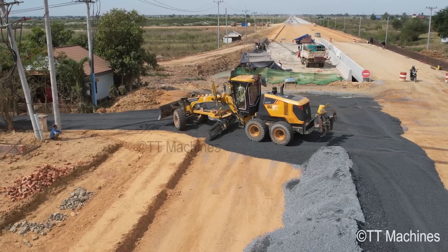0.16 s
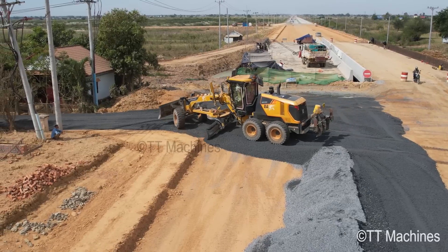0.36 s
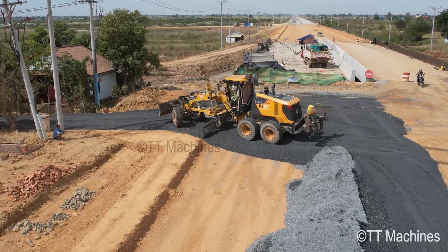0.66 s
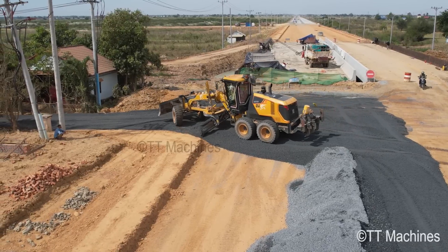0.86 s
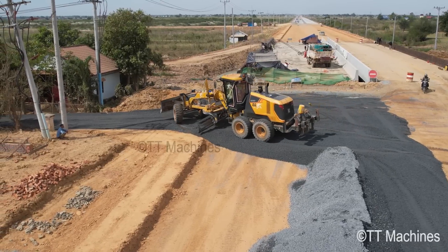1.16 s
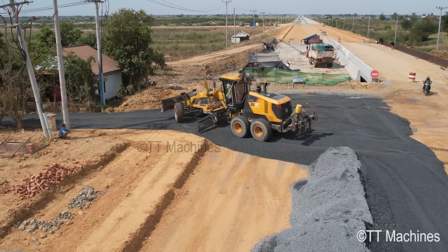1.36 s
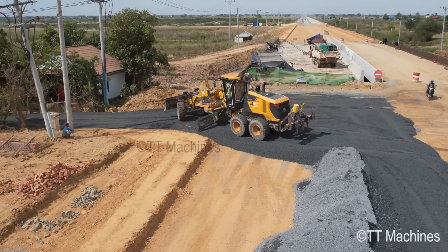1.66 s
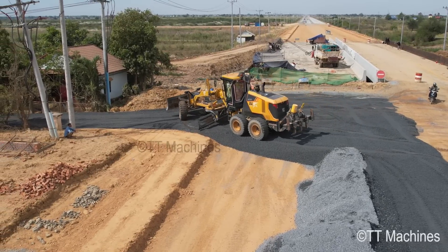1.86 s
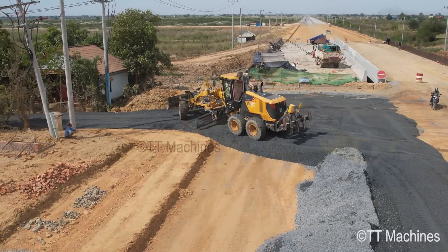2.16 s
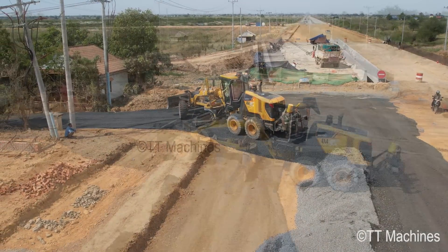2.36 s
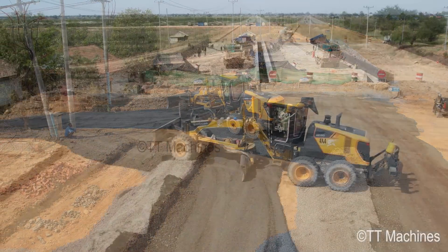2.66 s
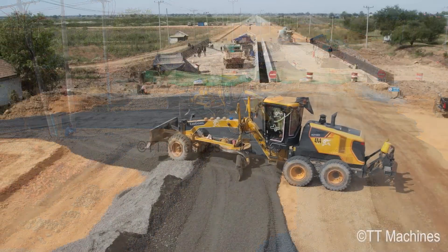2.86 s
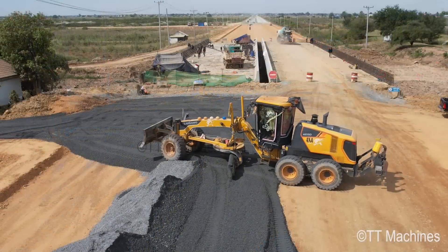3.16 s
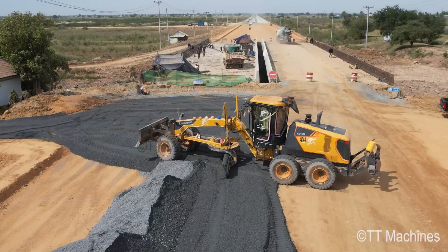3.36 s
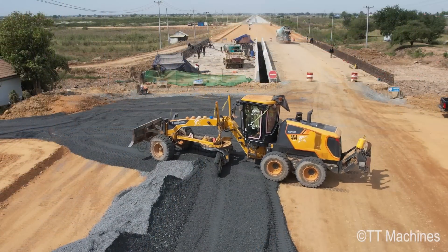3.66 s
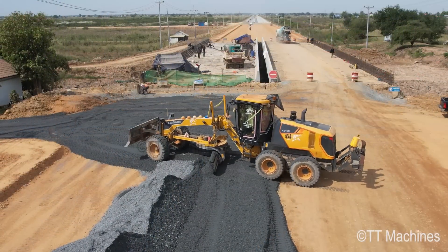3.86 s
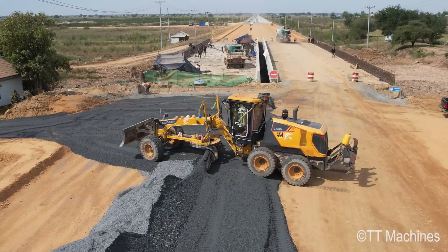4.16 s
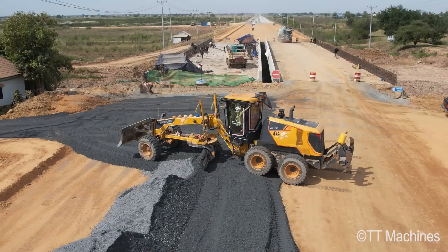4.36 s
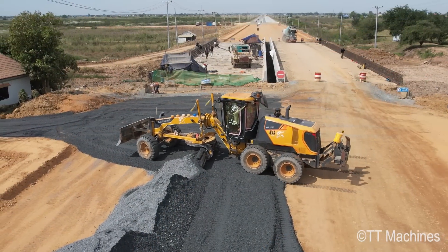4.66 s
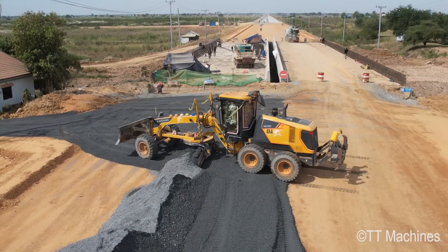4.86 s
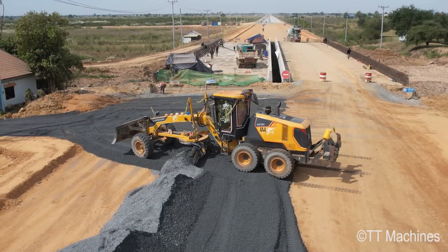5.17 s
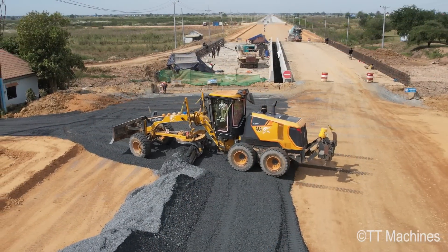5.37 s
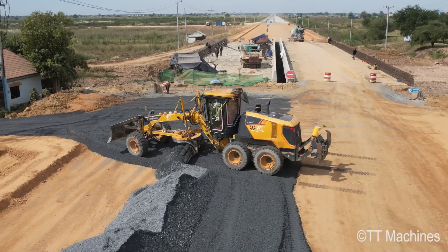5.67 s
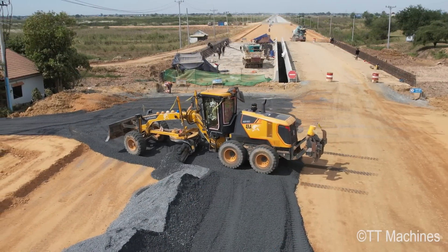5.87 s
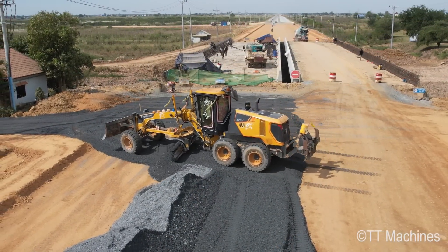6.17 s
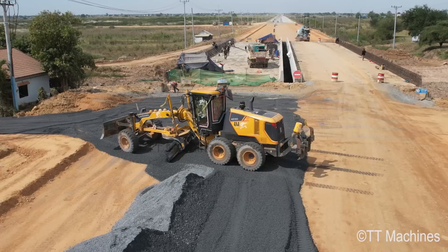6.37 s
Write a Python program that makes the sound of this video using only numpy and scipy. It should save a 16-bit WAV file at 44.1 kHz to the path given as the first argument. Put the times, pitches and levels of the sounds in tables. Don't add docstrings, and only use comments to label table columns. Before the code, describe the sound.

Outdoors at a roadworks site, a heavy diesel grader roars right beside a stereo microphone, with throbbing exhaust, pump and gear hums, rushing air and a thin turbo whistle. Just before two seconds it abruptly becomes farther, quieter and duller. Gravel hisses along the blade, stones tick and two crack sharply, then the exhaust turns toward us and its low throb rebuilds. Pump whines and faint bird whistles follow.

```python
import sys
import numpy as np
from scipy import signal
from scipy.io import wavfile
from scipy.ndimage import uniform_filter1d, map_coordinates

SR = 44100
rng = np.random.default_rng(int(sys.argv[2]) if len(sys.argv) > 2 else 0)


def int16_out(signal):
    q = np.round(np.clip(np.atleast_2d(signal).T, -1, 1) * 32767)
    wavfile.write(sys.argv[1], SR, q.astype(np.int16))


def voltage_ratio(decibels):
    exponent = np.asarray(decibels, float) / 20
    return 10 ** exponent


N = 286650
T = np.arange(N) / SR
CHANGE_S = 1.92

# (frequency [Hz], likeness [0-1], right over left [dB], right leads by [radians])
OPENINGS_TOP = [(8300, .93, -.5, .15), (9470, .94, 0, 1.35), (10350, .94, 0, 2.55), (12100, .9, 0, 3.7),
                (12950, .8, 0, 4.9), (13800, .9, 0, 6.28)]
# (time [s], ground echo delay [ms], turn [0-1])
MACHINE_PATH = [(1.92, 1.47, .02), (3.0, 1.48, 0.05), (3.6, 1.62, 0.33), (4.1, 1.69, 0.7),
                (4.8, 1.74, 0.87), (6.5, 1.77, 1)]


def evened(x):
    return x / np.sqrt(np.mean(abs(x) ** 2) + 1e-20)


def columns(rows, at):
    key, *rest = np.transpose(rows)
    return [np.interp(at, key, column) for column in rest]


def swells(rows, rest_db=0):
    level_db = rest_db
    for centre_s, length_s, db in rows:
        inside = np.clip(2 - 4 * abs(T - centre_s) / length_s, 0, 1)
        level_db = level_db + (db - rest_db) * inside
    return level_db


def wander(per_s):
    steps = rng.standard_normal(int(7 * per_s) + 3)
    coarse_t = T[::64]
    smooth = map_coordinates(steps, [coarse_t * per_s], order=3)
    return np.interp(T, coarse_t, evened(smooth))


def line(hz, db, flutter_db=3., flutter_per_s=12., waver=.002):
    turns = np.cumsum(hz * (1 + waver * wander(flutter_per_s))) / SR + rng.random()
    flutter = evened(voltage_ratio(flutter_db * wander(flutter_per_s)))
    return np.sqrt(2) * voltage_ratio(db) * flutter * np.sin(2 * np.pi * turns)


def heard(layers, tones, openings, echo, patchy_db):
    hz, t, tone = signal.stft(tones, SR, nperseg=2048, noverlap=1536)
    power = 0
    for colour, level_db in layers:
        f, db = np.transpose(colour)
        colour_db = np.interp(np.log(hz + 1), np.log(f), db, left=-90, right=-90)
        shape = evened(voltage_ratio(colour_db)) ** 2
        power = power + np.outer(shape, voltage_ratio(np.interp(t, T, level_db)) ** 2)

    def noise():
        return rng.standard_normal(tone.shape) + 1j * rng.standard_normal(tone.shape)

    patches = uniform_filter1d(rng.standard_normal(tone.shape), size=10, axis=0)
    patches = evened(uniform_filter1d(patches, size=5, axis=1))
    size = np.sqrt(power * 3 / 2048) * voltage_ratio(patchy_db * patches)
    same, right_db, lead = openings(hz, t)
    direct = np.sqrt(same) * size * echo(hz, t) * noise() + tone
    left = direct + np.sqrt(1 - same) * size * noise()
    right = direct + np.sqrt(1 - same) * size * noise()
    left = left * voltage_ratio(-right_db / 2)
    right = right * voltage_ratio(right_db / 2) * np.exp(1j * lead)
    sound = signal.istft(np.array([left, right]), SR, nperseg=2048, noverlap=1536)[1]
    return sound[:, :len(tones)]


def bird():
    # (start [s], length [s], start pitch [Hz], end pitch [Hz], level [dB])
    chirps = [
        (2.8, .1, 2820, 2950, -46),
        (3.2, .1, 2850, 2930, -48),
        (4.92, .08, 2750, 2930, -45),
        (5.98, .08, 2750, 2970, -40.5),
        (6.12, .12, 3010, 2750, -45),
        (6.32, .08, 2800, 2970, -38.5),
        (6.46, .04, 2940, 2960, -45),
    ]
    out = np.zeros(N)
    for start_s, length_s, hz0, hz1, db in chirps:
        along = np.clip((T - start_s) / length_s, 0, 1)
        out += np.sin(np.pi * along) * line(hz0 + (hz1 - hz0) * along, db, 1.5, 40., .002)
    return out


def sides(left_db):
    return voltage_ratio([[left_db / 2], [-left_db / 2]])


def blade_ticks():
    # (time [s], peak [dB], ring [Hz], left over right [dB])
    ticks = [(2.0145, -26, 4100, 3), (2.116, -33, 6300, 1), (3.531, -28, 4800, 1), (2.1874, -34, 6990, 3.5),
             (2.2388, -25, 6930, 3.0), (2.2914, -33, 6820, 0.5), (2.3244, -29, 7030, 0.5),
             (2.3484, -34, 7360, 1.5), (2.3675, -31, 5850, 0.0), (2.394, -29, 5240, 0.0),
             (2.4463, -31, 5890, 3), (2.6254, -33, 6980, 4.0), (2.6524, -27, 8180, 5.0),
             (2.6784, -33, 5250, 7), (2.7028, -29, 6220, 6.5), (3.3483, -28, 8310, 3.5),
             (3.55, -34, 8800, 2.5)]
    out, t = np.zeros((2, N)), np.arange(300) / SR
    for s, db, hz, left_db in ticks:
        rise_and_fall = np.sin(np.pi * np.minimum(t / .001, 1)) ** 2
        tick = np.sin(2 * np.pi * hz * t) * rise_and_fall
        out[:, round(s * SR):][:, :len(t)] += voltage_ratio(db - 2) * sides(left_db) * tick
    return out


def tyre_snaps():
    # (time [s], peak [dB], size [0-1], left over right [dB])
    cracks = [
        (2.7426, -15, 1, 4),
        (2.7879, -21.5, .6, 7),
    ]
    # (pitch [Hz], level [dB], peak time [ms], spread [ms])
    modes = [(13800, -12, .45, .18), (8200, .8, .35, .31), (5400, -2.5, .85, .35), (3700, -3.5, 1.1, .5),
             (2050, -10, 1.5, .6), (1180, -12, 1.9, .9)]
    out, t = np.zeros((2, N)), np.arange(300) / SR
    for s, db, size, left_db in cracks:
        crack = 0
        for hz, mode_db, peak_ms, spread_ms in modes:
            burst = np.exp(-((1000 * t - size * peak_ms) / spread_ms) ** 2)
            crack = crack + voltage_ratio(mode_db) * size ** peak_ms * np.sin(2 * np.pi * hz * t) * burst
        crack = crack * np.minimum(t / .0002, 1)
        out[:, round(s * SR):][:, :len(t)] += voltage_ratio(db) * sides(left_db) * crack
    return out


def gravel():
    # (frequency [Hz], level [dB per Hz])
    gravel_colour = [(2500, -22), (3300, 2), (4000, -5.5), (5000, -9.5), (7200, -4), (8500, -32)]
    # (time [s], level [dB])
    gravel_level = [
        (1.92, -48),
        (2.12, -44),
        (2.3, -37.5),
        (2.6, -41),
        (3.0, -45.5),
        (3.5, -68),
        (6.5, -61),
    ]
    return gravel_colour, columns(gravel_level, T)[0]


def noise_bands():
    # (pitch [Hz], width [Hz], centre [s], length [s], level [dB])
    bands = [(1364, 150, 2.55, 2.6, -41.5), (1050, 60, 2.5, 1.1, -46), (4450, 290, 3.2, 1.2, -55),
             (4120, 220, 4.1, 2.2, -57), (3980, 250, 5.8, 2.4, -60), (4450, 200, 5.7, 2.6, -61),
             (1880, 120, 3.1, .8, -54), (4700, 700, 3.56, .12, -50), (2000, 160, 5.5, 3.2, -50),
             (1270, 120, 5.6, 2.6, -49.5), (250, 79, 3.6, 1.4, -38), (360, 60, 3.6, 1.4, -40),
             (2450, 160, 2.8, 1.4, -49), (7000, 900, 2.16, .1, -51), (6000, 3000, 4.5, .2, -48)]
    layers = []
    for hz, width, centre_s, length_s, db in bands:
        colour = [(hz - width, -30), (hz - width / 2, 0), (hz + width / 2, 0), (hz + width, -30)]
        layers.append((colour, swells([(centre_s, length_s, db)], -70)))
    return layers


def far_gears():
    # (time [s], pitch [Hz], level [dB])
    shaft = [(3.2, 172, -61), (3.5, 172, -34), (4.7, 171.9, -44), (5.0, 172.5, -32), (5.9, 170.3, -34),
             (6.5, 167.6, -37)]
    mesh_low = [(1.92, 2520, -60), (2.3, 2465, -50), (2.9, 2444, -49), (3.5, 2446, -46), (4.6, 2430, -50),
                (5.0, 2440, -75)]
    mesh_high = [(3.5, 3280, -70), (4.4, 3240, -52), (5.0, 3300, -49), (5.3, 3310, -51), (5.7, 3310, -55),
                 (6.5, 3300, -58)]
    mesh_top = [(1.92, 2815, -58), (2.3, 2830, -49), (2.7, 2820, -49), (3.1, 2820, -75)]
    tones = line(*columns(shaft, T), 2.8, 6., 0.00167)
    for mesh in (mesh_low, mesh_high, mesh_top):
        tones = tones + line(*columns(mesh, T), 2.8, 40., 0.009)
    return tones


def far_whine():
    # (centre [s], length [s], level [dB])
    loads = [(4.3, 0.49, -44.5), (4.7, .15, -48), (5.0, 0.29, -41), (5.41, 0.16, -40), (5.75, 0.22, -40.5),
             (6.1, 0.68, -41.5), (6.46, 0.17, -41)]
    # (multiple of the whine, level against it [dB])
    overtones = [(2, -12), (3.82, -19)]
    whine_hz, whine_db = 1138, swells(loads, -67)
    tones = line(whine_hz, whine_db, 2.4, 30., 0.011)
    for multiple, db in overtones:
        tones = tones + line(multiple * whine_hz, whine_db + db, 2.2, 35., 0.011)
    return tones


def far_turbo():
    # (time [s], pitch [Hz], level [dB])
    whistle = [(1.92, 7445, -48), (2.08, 7455, -49), (2.2, 7490, -55), (2.32, 7540, -58), (2.42, 7580, -80)]
    top_whistle = [(3.4, 15143, -77), (3.59, 15411, -61), (3.61, 15230, -79), (4.05, 15368, -69),
                   (5.55, 15417, -71), (6.15, 15245, -63), (6.5, 15171, -73)]
    top_started = T > top_whistle[0][0]
    top = top_started * line(*columns(top_whistle, T), 2., 20., .001)
    return line(*columns(whistle, T), 1.5, 30., 0.00045) + top


def far_openings(hz, t):
    # (frequency [Hz], likeness [0-1], right over left [dB], right leads by [radians])
    before_turn = [(0, .78, 1, .3), (300, .8, .5, .7), (800, .6, 0, -.1), (1300, .65, 2, .3),
                   (1650, .55, 4, 1.3), (2000, .7, 4, .7), (2700, .75, 8, -.1), (3300, .65, 7, -1.3),
                   (4100, .35, 5, -1.8), (5200, .15, -1, -2.), (7300, .62, -6, -2.3), (7750, .45, -9, -2.2),
                   (7950, .5, -7, .5)]
    after_turn = [(0, .86, 0, 0), (450, .75, 0, 0), (1100, .85, 1, .2), (1500, .75, 1, .8),
                  (2250, .9, 4, .1), (3300, .8, 6.5, -1.9), (3550, .66, 0, -2.6), (3780, .1, -4.5, -1.5),
                  (4150, .7, -1, .1), (5200, .2, -3, .3), (6000, .45, -4.5, -.2), (7250, .5, -1, -1.7),
                  (7600, .6, -3, -2.4), (7900, .3, -8, -.5)]
    turn = np.clip(columns(MACHINE_PATH, t)[1], 0, 1)
    before = columns(before_turn + OPENINGS_TOP, hz)
    after = columns(after_turn + OPENINGS_TOP, hz)
    return [a[:, None] * (1 - turn) + b[:, None] * turn for a, b in zip(before, after)]


def ground_echo(hz, t):
    late_ms, turn = columns(MACHINE_PATH, t)
    soft = .8 * np.clip((1350 - hz) / 400, 0, 1)[:, None]
    late = np.exp(1j * (soft * turn - 2 * np.pi * np.outer(hz, late_ms / 1000)))
    reach = hz ** 2 / (hz ** 2 + 450. ** 2) / (1 + (hz / 2700.) ** 2)
    strength = .85 * reach[:, None] * (.6 + .4 * turn)
    return (1 + strength * late) / np.sqrt(1 + strength ** 2)


def far_engine():
    # (frequency [Hz], level [dB per Hz])
    throb_colour = [(22, -54), (35, -22), (55, -7), (80, -5), (105, 3), (135, -11), (190, -20)]
    body_colour = [(100, -36), (150, -8.5), (200, -6), (240, -1.5), (320, -7.5), (370, -4.5), (450, -16.5),
                   (650, -31)]
    roar_colour = [(300, -12), (480, -6), (700, -2.5), (1200, -4), (1800, -9), (2500, -9), (3300, -12),
                   (3700, -29), (5000, -21.5)]
    hiss_colour = [(2800, -21), (3700, -3), (5000, -6), (7000, -4.5), (7800, -7), (8500, -5), (10300, -4.5),
                   (11100, -13), (12000, -9.5), (13000, -15), (14000, -22), (14900, -15), (15400, -21),
                   (15780, -24), (15900, -60)]
    # (facing away [dB], facing us [dB], drift [dB per s])
    layer_levels = [
        (-35, -25.5, 0.17),
        (-36, -24, -1.5),
        (-34, -32.5, 0.32),
        (-44.5, -42.5, -0.1),
    ]
    # (time [s], how far the exhaust faces us [0-1])
    facing_path = [
        (1.92, 0.2),
        (2.5, 0),
        (3.1, 0.3),
        (3.3, 0.87),
        (4.3, 0.91),
        (5.1, 0.97),
        (6.5, 0.96),
    ]
    # (centre [s], length [s], change [dB])
    throb_surges = [
        (2.14, .1, -3),
        (2.28, 0.18, 6),
        (2.59, 0.12, 8),
        (3.2, 0.23, -6),
        (3.95, 0.23, 0),
    ]
    body_surges = [
        (2.07, 0.094, 3),
        (2.57, 0.11, 4),
        (2.79, 0.12, 4.5),
        (3.0, .2, -1.5),
        (3.4, 0.33, 1),
        (4.1, 0.36, 1.5),
    ]
    # (time [s], pitch [Hz])
    exhaust_pitch = [(1.92, 98.46), (5.8, 99.02), (6.1, 96.8), (6.5, 97.6)]
    # (centre [s], length [s], change [dB])
    exhaust_swells = [(2.06, 0.097, 8.5), (2.3, 0.13, 11), (3.33, 0.092, 3.5), (3.5, 0.23, -8),
                      (3.8, .12, 4.5), (3.89, 0.071, -11), (4.83, 0.12, -18), (5.18, 0.069, -21),
                      (5.85, 0.14, -4), (6.19, 0.07, -17), (6.25, 0.08, 2), (6.34, 0.11, -0.5)]
    drone_swells = [(3.18, .12, -8), (4.5, 0.81, 0), (5.16, .12, -5), (5.35, 0.14, 5), (6.0, 0.25, 0),
                    (6.41, .1, 4), (6.48, 0.052, -10)]
    # (multiple of the pump speed, level over the body [dB])
    pump_lines = [(2.58, -13.5), (3.45, -17), (4, -8.5), (6.05, -16), (10.6, -20.5)]
    pump_hz, drone_hz = 57.87, 80.3
    facing, = columns(facing_path, T)

    def blend(away_db, facing_db):
        return away_db + (facing_db - away_db) * facing

    levels_db = [blend(away, toward) + drift * (T - CHANGE_S) for away, toward, drift in layer_levels]
    throb_db, body_db, roar_db, hiss_db = levels_db
    throb_db = throb_db + swells(throb_surges)
    body_db = body_db + swells(body_surges)

    exhaust_db = blend(-41.5, -21.5) + swells(exhaust_swells)
    drone_db = blend(-39.5, -32) + swells(drone_swells)
    tones = line(*columns(exhaust_pitch, T), exhaust_db, 1.4, 7.4, 0.008)
    tones = tones + line(drone_hz, drone_db, 2.9, 10., 0.0196)
    for multiple, db in pump_lines:
        tones = tones + line(multiple * pump_hz, body_db + db, 2.9, 16., 0.01202)
    tones = tones + far_turbo() + far_gears() + far_whine() + bird()
    layers = [(throb_colour, throb_db), (body_colour, body_db), (roar_colour, roar_db), (hiss_colour, hiss_db)]
    return heard([*layers, gravel(), *noise_bands()], tones, far_openings, ground_echo, 1.28)


def close_pump():
    # (multiple of the pump speed, level [dB])
    pump_lines = [(2, -42), (3, -39), (4.5, -39), (4.9, -37), (6, -31.5), (8.1, -40), (9, -39), (74.5, -51),
                  (41, -48)]
    # (centre [s], length [s], level [dB])
    surges = [(.2, 0.38, -31), (.82, .3, -25), (1.05, 0.24, -26), (1.28, 0.13, -25), (1.56, 0.13, -29),
              (1.8, 0.32, -21)]
    pump_hz = 57.76
    tones = line(4.02 * pump_hz, swells(surges, -36.5), 1.8, 30., 0.018)
    for multiple, db in pump_lines:
        tones = tones + line(multiple * pump_hz, db, 2.8, 22., 0.006)
    return tones


def close_gears(firing_hz):
    # (centre [s], length [s], level [dB])
    gear_swells = [(.11, .7, -28), (1.17, .7, -31), (1.33, .2, -38), (1.72, .3, -35)]
    fan_swells = [(.35, 0.27, -40), (.6, .4, -38), (.85, .2, -43), (1.38, 0.16, -37.5), (1.58, .2, -39.5),
                  (1.85, 0.39, -36.5)]
    drive_swells = [(0.25, .34, -40), (.49, .09, -40), (.61, .18, -41), (.73, .1, -40), (.94, 0.39, -39),
                    (1.27, .18, -40.5), (1.5, 0.26, -41), (1.78, 0.16, -37.5), (1.9, .1, -41)]
    gear = line(14.31 * firing_hz, swells(gear_swells, -41), 1.1, 25., 0.0016)
    fan = line(25.62 * firing_hz, swells(fan_swells, -47), 1.6, 50., 0.0016)
    drive = line(28.02 * firing_hz, swells(drive_swells, -52), 2., 55., 0.0018)
    return gear + fan + drive


def close_turbo():
    # (time [s], pitch [Hz])
    whistle_pitch = [(.25, 7225), (.5, 7190), (.9, 7160), (1.02, 7165), (1.2, 7135), (1.36, 7125),
                     (1.55, 7160), (1.92, 7145)]
    # (centre [s], length [s], level [dB])
    whistle_swells = [(.05, 0.13, -38.5), (.29, 0.41, -35), (.66, .15, -40), (.84, .15, -36.5),
                      (1.1, 0.29, -34.5), (1.27, 0.2, -35.5), (1.79, 0.21, -34.5)]
    return line(*columns(whistle_pitch, T), swells(whistle_swells, -42.5), 1.6, 40., .0005)


def close_openings(hz, t):
    # (frequency [Hz], likeness [0-1], right over left [dB], right leads by [radians])
    beside = [(0, .93, -1.3, 0), (260, .95, .7, .55), (800, .9, 2.5, 1.35), (1300, .75, 3, 2.1),
              (1650, .68, 1, 2.7), (2000, .6, -1, 1.8), (2500, .45, 1, 1.8), (2900, .2, 1, .5),
              (3300, .62, 5, -.4), (4200, .73, 2, -.6), (5300, .25, -8, -1.6), (6200, .7, -7, -1.1),
              (7500, .5, -5, -.9), (7900, .75, -2, .2)]
    return [column[:, None] for column in columns(beside + OPENINGS_TOP, hz)]


def close_engine():
    # (frequency [Hz], level [dB per Hz])
    rumble_colour = [(22, -50), (35, -20), (55, -6), (95, 2.5), (145, -8.5), (230, 2.5), (320, -5.5),
                     (460, -6.5), (650, -15), (900, -16.5)]
    roar_colour = [(300, -35), (500, -10), (800, -4.5), (1200, -5), (1700, -10.5), (2600, -15),
                   (3400, -16.5), (4300, -17.5), (6000, -27)]
    hiss_colour = [(2500, -25), (3600, -6), (5000, -6.5), (6500, -0.5), (7200, 4.5), (8000, 0), (10000, 2),
                   (10800, -3), (11050, -22), (11550, -24), (11750, -1.5), (14300, -13), (15200, -27),
                   (15500, -56)]
    layer_db = [-20, -27, -32]
    layer_drift = [1, 0, -0.8]
    # (time [s], cylinder firing rate [Hz])
    firing_rate = [(0, 99.), (.32, 99.4), (.64, 100.4), (.96, 100.7), (1.92, 100.6)]
    # (multiple of the firing rate, level [dB])
    firing_lines = [(1.5, -43), (4, -41), (6, -40), (7, -39.5), (8, -35), (10, -43), (11, -40), (20, -43),
                    (22, -47.5), (32, -49)]
    # (centre [s], length [s], level [dB])
    firing_swells = [
        (.22, 0.49, -20.5),
        (.6, .1, -21.5),
        (1.05, .12, -23),
        (.89, 0.2, -41),
        (1.3, 0.46, -33.5),
        (1.9, 0.19, -34),
    ]
    firing_hz, = columns(firing_rate, T)
    tones = line(firing_hz, swells(firing_swells, -24), 1.1, 12., 0.0022)
    for multiple, db in firing_lines:
        tones = tones + line(multiple * firing_hz, db, 1.9, 12., 0.0013)
    tones = tones + close_pump() + close_gears(firing_hz) + close_turbo()
    levels_db = [db + drift * T for db, drift in zip(layer_db, layer_drift)]
    layers = zip([rumble_colour, roar_colour, hiss_colour], levels_db)
    length = 2 * SR
    sound = heard(layers, tones[:length], close_openings, lambda hz, t: 1, 1.26)
    return np.pad(sound, ((0, 0), (0, N - length)))


def scene():
    after = np.clip((T - CHANGE_S) / .002, 0, 1)
    engine = (1 - after) * close_engine() + after * far_engine()
    return engine + tyre_snaps() + blade_ticks()


def top_cut(x):
    return signal.sosfilt(signal.butter(12, 16520, fs=SR, output="sos"), x)


def record(dry):
    bass_cut = signal.butter(6, 37., "highpass", fs=SR, output="sos")
    thinned = signal.sosfilt(bass_cut, dry)
    return top_cut(thinned)


dry = scene()
out = record(dry)
int16_out(out)
```